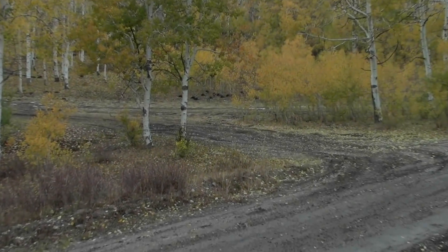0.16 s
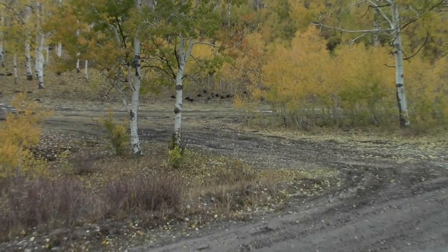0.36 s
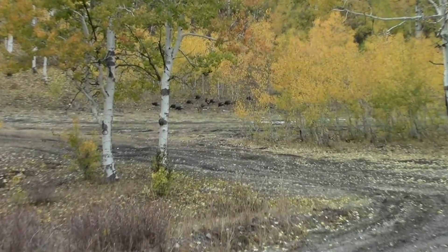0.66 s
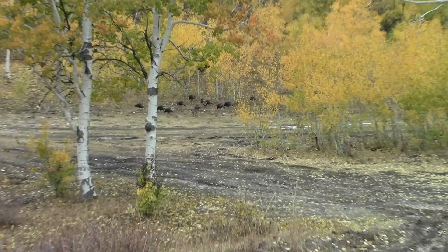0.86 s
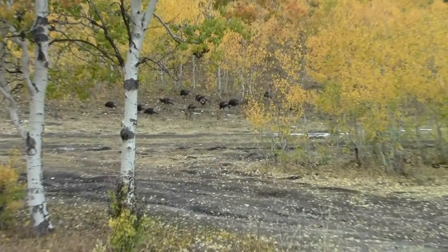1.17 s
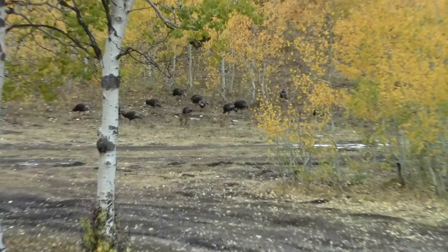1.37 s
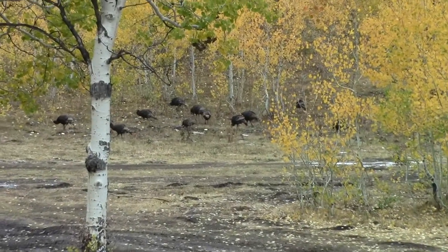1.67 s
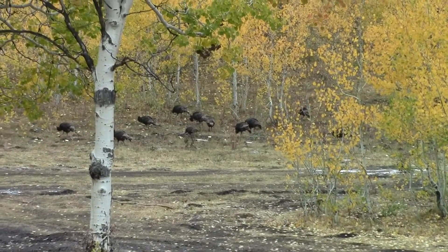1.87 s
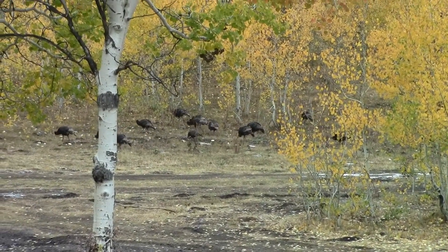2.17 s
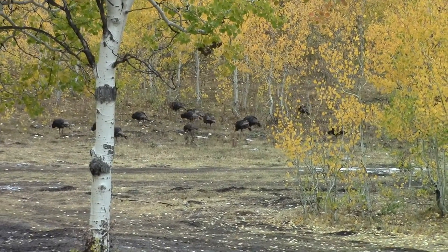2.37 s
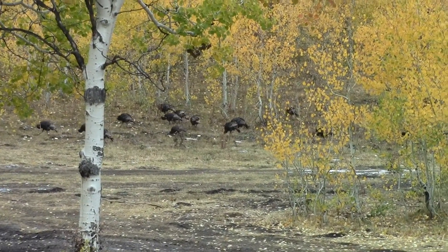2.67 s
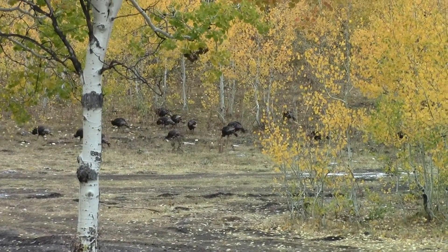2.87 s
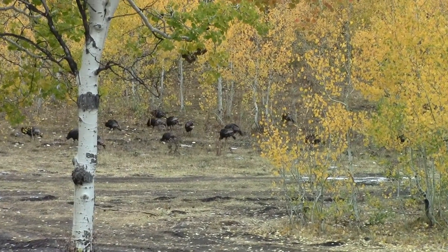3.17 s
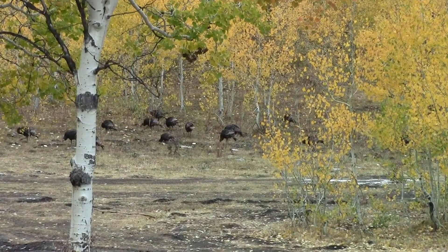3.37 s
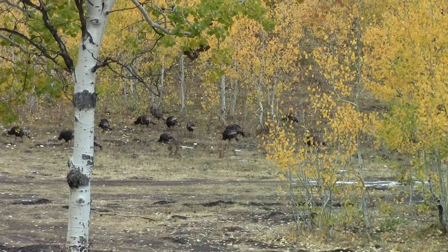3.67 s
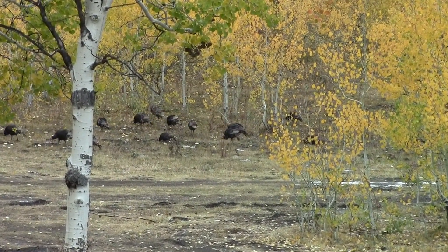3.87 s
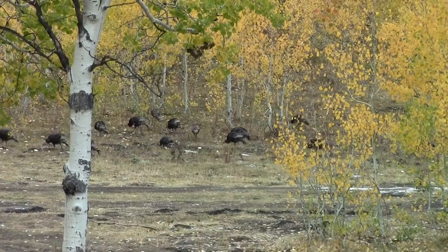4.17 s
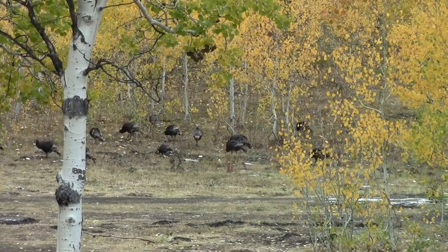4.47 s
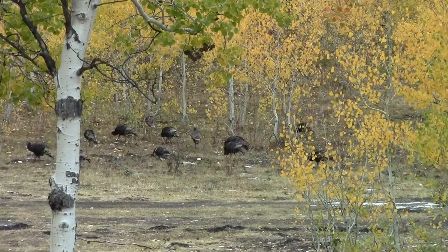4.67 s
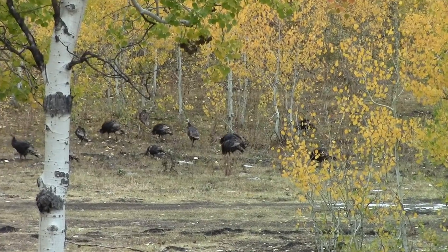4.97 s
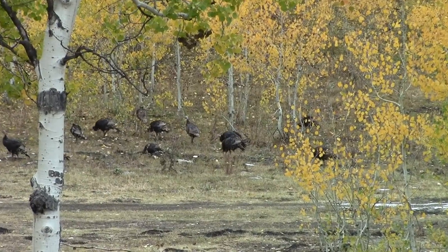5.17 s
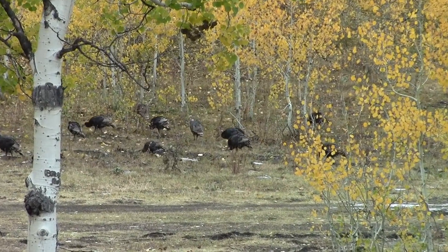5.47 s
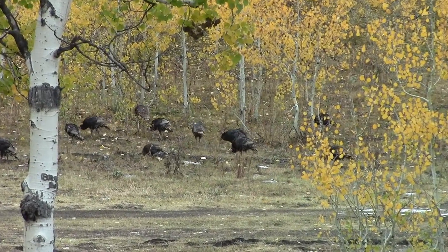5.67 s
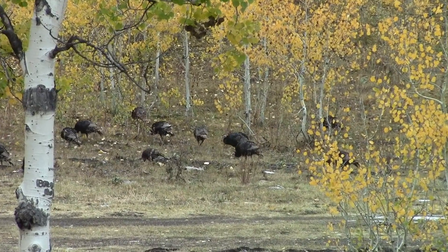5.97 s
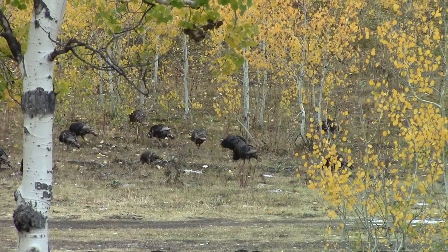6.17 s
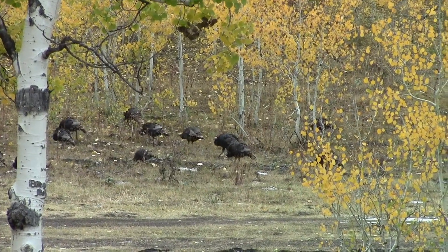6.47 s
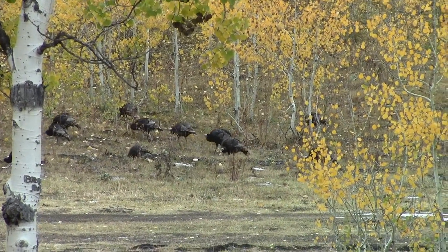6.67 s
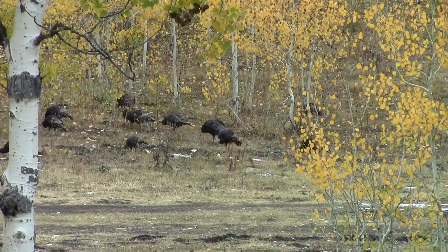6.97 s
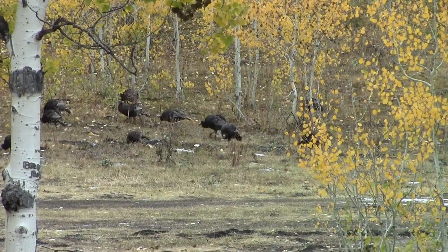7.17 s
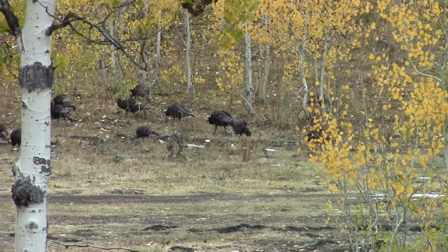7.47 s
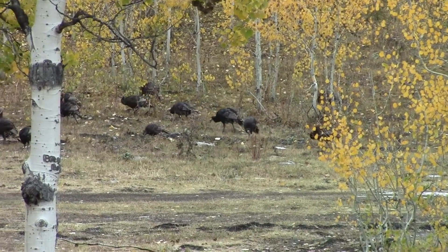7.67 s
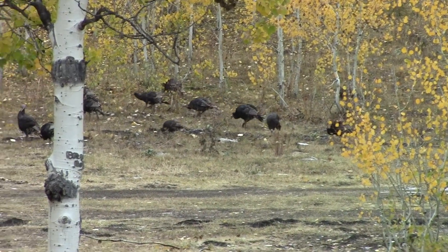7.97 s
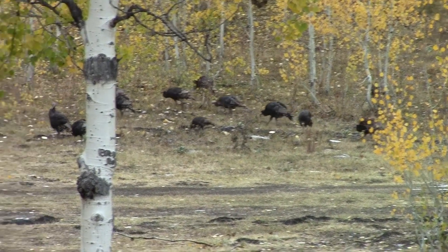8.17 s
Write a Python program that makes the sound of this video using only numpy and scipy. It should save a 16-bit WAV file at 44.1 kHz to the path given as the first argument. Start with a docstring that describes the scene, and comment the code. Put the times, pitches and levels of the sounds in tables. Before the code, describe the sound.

Quiet open woodland, about 8.3 seconds, heard through a hand-held camera microphone. Soft leaf hiss and low air run throughout, with a very faint low drone fading away. From 0 to 1.6 s a small zoom motor hums and whirrs, then stops. At 0.75 s a near turkey gives a soft falling note, with a dull camera bump. From 1.1 to 3.4 s come eight loud yelps roughly 0.3 s apart, each starting as a high whistle, plunging into a nasal, raspy note and flicking upward; four crack lower midway. Tiny falling peeps appear around 1.1, 2.6 and 2.9 s. Trunks return short echoes. A far turkey answers, hollow and reverberant, at 4.2, 5.1, 5.4, 5.7, 6.0 and 6.4 s, strongest at 5.7 and 6.0. Dry leaf ticks and brief rustles continue, with soft bumps near 2.4, 4.2-4.4 and 7.4 s, before a quiet, breezy end.

```python
"""Turkeys calling across a clearing

A near bird gives a soft falling note, then eight yelps that swoop down and flick up; a far bird answers.
Each voice is a sum of harmonic partials, in four near yelps cracking to a lower register, with noise for rasp.
Trunks, brush and deep wood return echoes; filtered noise makes the leaf hiss and a low drone.
Decaying noise bursts make leaf ticks and bumps on a hand-held camera; its zoom motor hums at the start."""
import sys
import numpy as np
from scipy import signal
from scipy.fft import rfft, irfft, next_fast_len
from scipy.io import wavfile
from scipy.ndimage import uniform_filter1d

SR = 44100
rng = np.random.default_rng(int(sys.argv[2]) if len(sys.argv) > 2 else 0)


def generate_wav(sig):
    """Save sig (samples, or channels by samples) to the path in sys.argv[1] as 16-bit PCM at SR."""
    pcm = np.round(np.clip(np.atleast_2d(sig).T, -1, 1) * 32767).astype(np.int16)
    wavfile.write(sys.argv[1], SR, pcm)


N = 367617
TIME = np.arange(N) / SR
TOP_HZ = 15800  # upper limit of the partials and of the final low-pass


def undb(db):
    """Amplitude gain is ten to the power of decibels over twenty."""
    return 10 ** (np.asarray(db) / 20)


def unit(x):
    """Normalisation: division by the root mean square gives rms 1."""
    return x / np.sqrt(np.mean(x ** 2))


def at_hz(points, hz):
    """Interpolation of (frequency [Hz], value) points on a logarithmic frequency axis."""
    f, value = np.transpose(points)
    return np.interp(np.log(np.maximum(hz, 1)), np.log(f), value)


def colour(x, points):
    """Linear filtering: the spectrum is multiplied by a (frequency [Hz], gain [dB]) curve."""
    n = x.shape[-1]
    size = next_fast_len(n, True)
    gain = undb(at_hz(points, np.fft.rfftfreq(size, 1 / SR)))
    return irfft(rfft(x, size) * gain, size)[..., :n]


def wobble(n, rate_hz, size=4096):
    """Slow random modulation: smoothed noise of spread about 1, moving up to about rate_hz."""
    steps = np.arange(n) * 8 * rate_hz / SR
    path = unit(np.convolve(rng.standard_normal(size), np.hanning(7), "same"))
    return np.interp(steps, np.arange(len(path)), path)


def band_noise(n, hz, spread):
    """Band-pass noise: white noise weakened away from the band hz / spread to hz * spread."""
    size = next_fast_len(n, True)
    f = np.fft.rfftfreq(size, 1 / SR) + 1
    detune = (f / hz - hz / f) / (spread - 1 / spread)
    spectrum = rfft(rng.standard_normal(size)) / np.hypot(1, detune ** 2)
    return unit(irfft(spectrum, size))[:n]


def add(out, start_s, x):
    """Superposition: x is summed into out from start_s on."""
    i = max(int(start_s * SR), 0)
    out[..., i:i + x.shape[-1]] += x[..., :N - i]


def gate(t, start, end, fade_s):
    """Amplitude envelope: 1 between start and end, with sine-squared edges just outside."""
    edge = np.clip(np.minimum(t - start, end - t) / fade_s + 1, 0, 1)
    return np.sin(np.pi / 2 * edge) ** 2


def soften(x, size=130):
    """Moving average: steps of a control are rounded over size samples."""
    return uniform_filter1d(x, size, axis=-1, mode="nearest")


# Spectral shape of leaf hiss and low air: (frequency [Hz], relative density [dB])
WOODS_SPECTRUM = [(18, -28), (30, 9.5), (32, -5.5), (81, -1), (114, -3), (178, -2), (258, -1), (286, -0.5),
                  (628, -7.5), (735, -7), (1490, -8.5), (1990, -10), (5120, -12), (9600, -16.5),
                  (15800, -25.5)]
# Stereo width of the woods: (frequency [Hz], side minus mid [dB])
WOODS_WIDTH = [(30, -17.5), (70, -10.5), (130, -1), (280, -0.5), (1000, -2), (4000, -9), (12000, -6)]
# Breeze in the leaves: (time [s], gain [dB])
BREEZE = [(0, 3), (.6, 1.1), (1.2, 1.8), (3.8, 1), (8.3, 0.5)]
WOODS_DB = -56  # rms of the mid signal before the breeze


def woods(swell_db=0.58):
    """Broadband turbulence: leaf hiss swells faintly over steady low air; the deepest bass is nearly mono."""
    mid, side = colour(rng.standard_normal((2, N)), WOODS_SPECTRUM)
    side = colour(side, WOODS_WIDTH)
    air = np.array([mid + side, mid - side]) / np.std(mid)
    low = signal.sosfiltfilt(signal.butter(2, 450, fs=SR, output="sos"), air)
    hiss = (air - low) * undb(swell_db * wobble(N, 11.0))
    return (low + hiss) * undb(WOODS_DB + np.interp(TIME, *np.transpose(BREEZE)))


# Faint drone under the woods: (time [s], level [dB])
DRONE_LEVEL = [(0, -64.5), (4.3, -67.5), (6, -71), (8.3, -84)]
DRONE_HZ = 97


def low_drone():
    """Narrow-band noise: a small bandwidth gives random noise an audible low pitch."""
    return undb(np.interp(TIME, *np.transpose(DRONE_LEVEL))) * band_noise(N, DRONE_HZ, 1.15)


# Zoom motor hum: (time [s], rms level [dB])
ZOOM_LEVEL = [(0, -59), (1.45, -59.5), (1.56, -68), (1.7, -120)]
ZOOM_HZ = 229


def zoom_motor(whirr_db=-4, waver=.004):
    """Frequency modulation: the motor's sine hum wavers in pitch beside band noise for gear whirr."""
    hz = ZOOM_HZ * (1 + waver * wobble(N, 9.2))
    hum = np.sqrt(2) * np.sin(2 * np.pi * np.cumsum(hz) / SR)
    whirr = undb(whirr_db) * band_noise(N, 257, 2.3)
    return undb(np.interp(TIME, *np.transpose(ZOOM_LEVEL))) * (hum + whirr)


def knocks(rows, spread, attack_s, side, snap_s=0.00019, size=8192):
    """Time-bandwidth reciprocity: decaying bursts of band noise, wider in band the shorter they are."""
    out = np.zeros((2, N))
    t = np.arange(size) / SR
    for start, db, hz, decay_s in rows:
        shape = (1 - np.exp(-t / attack_s)) * np.exp(-t / decay_s)
        mid, wide = (shape * band_noise(size, hz, spread + snap_s / decay_s) for _ in range(2))
        stereo = np.array([mid + side * wide, mid - side * wide])
        add(out, start, undb(db) * stereo / np.abs(mid).max())
    return out


# Soft bumps on the camera body: (time [s], peak level [dB], centre frequency [Hz], decay time [s])
CAMERA_BUMPS = [(.795, -34, 295, 0.046), (2.374, -35, 383, 0.0065), (4.224, -41.5, 195, 0.029),
                (4.365, -36.5, 122, 0.024), (4.385, -42, 280, 0.036), (7.405, -46, 397, 0.0097),
                (7.42, -43.5, 164, 0.018), (7.68, -51, 170, 0.022), (8.04, -57, 35.5, 0.027)]


def camera_bumps():
    """Damped impact response: each bump is a dull, nearly mono noise burst."""
    return knocks(CAMERA_BUMPS, spread=1.68, attack_s=0.0017, side=0.1)


def leaf_patter(peak_db=-44, scatter_db=3.5, count=70):
    """Random point process: faint ticks of dry leaves fall at independent random moments."""
    when, strength, pitch = rng.random((count, 3)).T
    level_db = peak_db + scatter_db * (2 * strength - 1)
    rows = np.transpose([when * TIME[-1], level_db, 4500 + 3000 * pitch, np.full(count, .002)])
    return knocks(rows, spread=1.15, attack_s=.0002, side=.4, size=1024)


# Dry leaves and twigs ticking close by: (time [s], peak level [dB], centre frequency [Hz], decay time [s])
LEAF_TICKS = [(2.754, -35, 7640, .006), (3.1353, -34, 7300, .008), (3.5425, -30, 1625, .0018),
              (3.757, -38, 7190, .0013), (3.988, -35, 4560, .0013), (4.0552, -38, 6270, .0009),
              (4.585, -44, 1490, .0034), (4.611, -35, 7500, .0007), (4.7487, -35.5, 7000, .0008),
              (5.2226, -32, 7060, .0007), (6.4428, -35, 7500, .0011), (6.6703, -37, 5500, .0015),
              (6.9731, -36, 4270, .0019), (7.1477, -35, 7000, .0015), (7.2724, -38, 5940, .002),
              (7.6535, -33.5, 9000, .0008)]
# Leaves brushing for a moment: (time [s], peak level [dB], centre frequency [Hz], decay time [s])
LEAF_RUSTLES = [(5.17, -44.5, 3900, 0.028), (5.825, -47.5, 6400, 0.014), (7.14, -47, 2460, 0.044),
                (7.32, -44, 5900, .025)]


def leaves():
    """Transient excitation: a fast attack makes a tick, a slower attack and wider band a rustle."""
    ticks = knocks(LEAF_TICKS, spread=1.22, attack_s=.0001, side=0.26)
    rustles = knocks(LEAF_RUSTLES, spread=1.75, attack_s=0.012, side=0.26)
    return ticks + rustles + leaf_patter()


# What the forest sends back: (frequency [Hz], gain [dB])
ECHO_COLOUR = [(200, -10), (680, -7), (1080, 0), (1550, 2), (2100, -3), (2600, 0), (3500, 0), (4500, -5),
               (8000, -10), (15000, -16)]
# Echoes off nearby trunks and the ground: (delay [s], level relative to the direct sound [dB])
TRUNK_ECHOES = [(.0061, -20.5), (0.0127, -12.5), (0.0203, -20.5), (.027, -20)]


def forest(x, brush_db, tail_db, brush_s=0.013, t60_s=0.9, edge_s=0.1774, edge_db=3, side_db=-7):
    """Convolution reverberation: trunk echoes, brush scatter, deep-wood decay, a soft far-edge echo."""
    t = np.arange(int(1.2 * SR)) / SR
    brush = np.exp(-t / brush_s) * (t > .004)
    edge = 1 + undb(edge_db) * np.exp(-((t - edge_s) / 0.0066) ** 2)
    tail = undb(-60 * t / t60_s) * (1 - np.exp(-t / 0.037)) * edge
    shape = undb(brush_db) * brush / np.linalg.norm(brush) + undb(tail_db) * tail / np.linalg.norm(tail)
    mid, side = shape * colour(rng.standard_normal((2, len(t))), ECHO_COLOUR)
    for delay_s, db in TRUNK_ECHOES:
        mid[int(delay_s * SR)] += undb(db)
    responses = [mid + sign * undb(side_db) * side for sign in (1, -1)]
    return np.array([x + signal.fftconvolve(x, response)[:N] for response in responses])


# Short falling peeps of the flock:
# (time [s], rms level [dB], start frequency [Hz], end frequency [Hz], length [s])
FLOCK_PEEPS = [(1.068, -56, 2700, 2400, 0.01), (2.57, -48, 2800, 2370, 0.019),
               (2.887, -44.5, 2550, 2220, 0.023), (2.888, -49, 1347, 1110, 0.021)]


def flock():
    """Linear chirp: each tiny peep is one sine whose frequency slides down."""
    out = np.zeros(N)
    for start, db, high_hz, low_hz, length in FLOCK_PEEPS:
        t = np.arange(-.004, length + 0.0033, 1 / SR)
        hz = np.interp(t, [0, length], [high_hz, low_hz])
        phase = 2 * np.pi * np.cumsum(hz) / SR
        add(out, start + t[0], np.sqrt(2) * undb(db) * gate(t, 0, length, .004) * np.sin(phase))
    return out


# Yelps of the far bird: (time [s], length [s], fundamental rms level [dB], held pitch [Hz],
#  step down at the crack [share of held pitch], gain of the high opening [dB])
FAR_YELPS = [(4.234, 0.067, -60, 614, 0.07, 3.5), (5.072, 0.075, -57.5, 627, .08, 3),
             (5.4, .075, -56.5, 625, .05, -1.5), (5.71, 0.089, -48, 682, 0.46, 1.5),
             (6.025, .084, -47.5, 675, 0.4, -1.5), (6.389, 0.086, -56, 652, 0.294, 3)]
# opening pitch as a multiple of the held pitch; swoop time constant [s]; crack after the start [s]
FAR_OPENING_RATIO, FAR_SWOOP_S, FAR_CRACK_S = 2.02, .018, .028


def far_bird(second_db=-15, third_db=-21, jitter=0.022, crack_s=0.0005, fade_s=0.0055):
    """Distance loss of overtones: a swoop and crack with little but the fundamental left."""
    out = np.zeros(N)
    for start, length, level_db, held_hz, step, opening_db in FAR_YELPS:
        t = np.arange(-fade_s, length + fade_s, 1 / SR)
        high = 1 / (1 + np.exp((t - FAR_CRACK_S) / crack_s))  # 1 before the crack, 0 after
        swoop = (FAR_OPENING_RATIO - 1 - step) * np.exp(-np.maximum(t, 0) / FAR_SWOOP_S)
        pitch = held_hz * (1 + swoop + step * high) * (1 + jitter * wobble(len(t), 145))
        phase = 2 * np.pi * np.cumsum(pitch) / SR
        voice = np.sin(phase) + undb(second_db) * np.sin(2 * phase) + undb(third_db) * np.sin(3 * phase)
        level = np.sqrt(2) * undb(level_db + opening_db * high)
        add(out, start + t[0], level * gate(t, fade_s, length, fade_s) * voice)
    return out


# Throat and beak resonance on the overtones: (frequency [Hz], gain [dB])
THROAT = [(1000, -13.5), (2000, 1.5), (2550, 7), (3200, -4.5), (3650, 6.5), (4000, -7), (4350, -27),
          (5200, -27), (6500, -36.5), (8400, -26), (9600, -44), (15000, -48.5)]
# Spectral shape of turbulent air in a raspy note: (frequency [Hz], relative level [dB])
RASP_SPECTRUM = [(100, -38), (160, -18), (330, -38), (480, -36), (900, -17), (1400, 2), (1850, -11),
                 (3900, -15), (4600, -35), (8200, -39), (15000, -56)]
# Spectral shape of the soft hiss on every near note: (frequency [Hz], relative level [dB])
BEAK_HISS = [(1000, -23), (4000, -24), (6500, 3), (8300, 4), (9600, -10.5), (15000, -18)]
WAVER_DB, WAVER_HZ = 1.2, 45  # each partial wavers in strength on its own


def syrinx(hz, partial_db, rasp, beat, jitter=.01, tremor=.002, shimmer=.15, flutter_hz=220,
           beat_hz=165, rasp_db=-3.5, hiss_db=-34, count=16):
    """Source-filter principle: membrane partials shaped by the throat; rasp makes cycles uneven and airy."""
    n = len(hz)
    first_db, second_db, upper_db = partial_db
    rasp = np.clip(rasp, 0, 1)
    pitch = hz * (1 + (tremor + jitter * rasp) * wobble(n, flutter_hz))
    # a slower second vibration of the syrinx sets side tones around each overtone
    slow = np.sin(2 * np.pi * np.cumsum(beat_hz * (1 + .08 * wobble(n, 40))) / SR)
    phase = 2 * np.pi * np.cumsum(pitch) / SR
    voice = np.zeros(n)
    for k in range(1, count + 1):
        if k == 1:
            db = first_db
        elif k == 2:
            db = second_db
        else:
            db = upper_db + at_hz(THROAT, k * pitch)
        uneven = 1 + shimmer * min(k, 3) * rasp * wobble(n, flutter_hz)
        waver = undb(WAVER_DB * wobble(n, WAVER_HZ))
        # the highest partials lose their grip on the cycle and blur
        blur = np.clip((k * pitch - 4200) / 5000, 0, .45) * wobble(n, flutter_hz)
        partial = np.sin(k * phase + min(k - 1, 2) * beat * slow + blur)
        voice += undb(db) * uneven * waver * partial * (k * pitch < TOP_HZ)
    pulse = 1 + .5 * np.sin(phase)  # the noise pulses with the fundamental
    air = unit(colour(rng.standard_normal(n), RASP_SPECTRUM)) * pulse
    hiss = unit(colour(rng.standard_normal(n), BEAK_HISS)) * pulse
    air_gain = undb(rasp_db + np.max(partial_db, axis=0)) * rasp ** 2
    return np.sqrt(2) * (voice + air_gain * air + undb(hiss_db + upper_db) * hiss)


OPENER_S, OPENER_LENGTH_S, OPENER_FROM_HZ, OPENER_TO_HZ = .738, 0.074, 950, 519
OPENER_DB, OPENER_FADE_DB = -37.5, 13.5  # fundamental level at the start, and how far it falls


def opener(swoop_s=0.025, second_db=-14, upper_db=-25, rasp=0.41):
    """Exponential glide: a soft note relaxes towards its low pitch and fades."""
    t = np.arange(0, OPENER_LENGTH_S, 1 / SR)
    hz = OPENER_TO_HZ + (OPENER_FROM_HZ - OPENER_TO_HZ) * np.exp(-t / swoop_s)
    db = OPENER_DB - OPENER_FADE_DB * (t / OPENER_LENGTH_S) ** 2
    voice = syrinx(hz, (db, db + second_db, db + upper_db), rasp, 0)
    return gate(t, .004, t[-1] - .004, .004) * voice


# Mid-yelp cracks into a lower register, held until the flick: (time [s], pitch at the crack [Hz],
#  fundamental [dB], second partial [dB], upper partials [dB], rasp [0-1])
CRACKS = [(1.478, 648, -25.5, -24, -30.5, 0.34), (1.821, 817, -27.5, -13.5, -28.5, 0.06),
          (2.118, 601.8, -22, -26.5, -34, 0.82), (2.751, 806, -37, -20, -33.5, 0.51)]
# Strength of the whistle by its pitch: (frequency [Hz], gain [dB])
WHISTLE = [(1150, -5), (1500, 1), (1750, -7.5), (2050, -15), (2800, -16)]
# octaves above the lowest pitch where the voice is a pure whistle, and the drop of its overtones there
WHISTLE_OCTAVES, WHISTLE_PURITY_DB = 0.51, 9.5
# BOW_S away from peak effort the pitch has risen by the bow, rasp has grown by the share SLACK_RASP,
# and (fundamental, second partial, upper partials) have sunk by EFFORT_SAG_DB
BOW_S, SLACK_RASP, EFFORT_SAG_DB = .05, .5, (2, 5, 9.5)
# by its end a cracked note has crept up by this share of its pitch and its partials have sunk by these dB
CRACK_LIFT, CRACK_SAG_DB = .075, (4, 6, 0.5)
# stumble at each change of register: added rasp, time scale, dip of the level
STUMBLE_RASP, STUMBLE_S, STUMBLE_DIP_DB = 0.28, 0.0045, 5.5
FLICK_FADE_DB = 1.5  # fade by the end of the flick


def yelp(row, fade_s=.003):
    """Register transition: whistle to bowed note, perhaps a crack to low register, then an upward flick."""
    (start, length, open_hz, swoop_s, bend, low_hz, peak_s, bow_hz,
     flick_s, flick_hz, end_hz, whistle_db, *peak_db, rasp, beat) = row
    flick = start + length
    t = np.arange(start - fade_s, flick + flick_s + fade_s, 1 / SR)

    # slack is zero at peak effort
    slack = ((t - start - peak_s) / BOW_S) ** 2
    bowed = low_hz + bow_hz * slack
    hz = bowed + (open_hz - bowed) * np.exp(-(np.maximum(t - start, 0) / swoop_s) ** bend)
    # thin is 1 in the whistle and 0 in the full voice
    thin = np.where(t < flick, np.clip(np.log2(hz / low_hz) / WHISTLE_OCTAVES, 0, 1) ** 2, 1)
    db = np.array(peak_db)[:, None] - np.outer(EFFORT_SAG_DB, np.minimum(slack, 1))
    rasp = rasp * (1 + SLACK_RASP * np.minimum(slack, 1))
    stumble = np.exp(-((t - flick) / STUMBLE_S + .5) ** 2)

    for crack, crack_hz, *crack_db, crack_rasp in CRACKS:
        if start < crack < flick:
            low = (t > crack) & (t < flick)
            tired = ((t - crack) / (flick - crack)) ** 2
            hz = np.where(low, crack_hz * (1 + CRACK_LIFT * tired), hz)
            rasp = np.where(low, crack_rasp, rasp)
            db = np.where(low, np.array(crack_db)[:, None] - np.outer(CRACK_SAG_DB, tired), db)
            stumble = stumble + np.exp(-((t - crack) / STUMBLE_S) ** 2)

    flicked = np.clip((t - flick) / flick_s, 0, 1)
    hz = soften(np.where(t < flick, hz, flick_hz + (end_hz - flick_hz) * flicked), size=50)
    overtone_db = peak_db[2] - WHISTLE_PURITY_DB
    second_db = overtone_db + at_hz(THROAT, 2 * hz)
    whistle = at_hz(WHISTLE, hz) + np.array(np.broadcast_arrays(whistle_db, second_db, overtone_db))
    db = soften(db + thin * (whistle - db)) - STUMBLE_DIP_DB * stumble - FLICK_FADE_DB * flicked ** 2
    voice = syrinx(hz, db, rasp + STUMBLE_RASP * stumble * (1 - rasp), beat)
    return t[0], gate(t, start, flick + flick_s, fade_s) * voice


# Near yelps, each a swoop, a bow whose pitch is lowest at peak effort, and a flick:
# (time [s], length up to the flick [s], opening pitch [Hz], swoop time [s],
#  swoop bend [exponent: 1 exponential, larger holds then plunges], lowest bowed pitch [Hz],
#  peak effort after the start [s], bow [Hz], flick length [s], flick start [Hz], flick end [Hz],
#  whistle [dB], fundamental [dB], second partial [dB], upper partials [dB],
#  rasp at peak effort [0-1], side-tone depth [rad])
YELPS = [(1.107, .126, 1196, 0.012, 0.84, 854.4, .076, 98.5, 0.011, 987, 1200, -29, -26, -43, -40.5, 0.12, .02),
         (1.424, .112, 1420, .006, 1, 857, .042, 296, 0.038, 998, 1820, -26.5, -28.5, -24.5, -28.5, 0.27, 0.13),
         (1.744, 0.12, 2276, 0.0075, 1, 1004, 0.078, 94.7, 0.033, 1235, 2180, -20, -24.5, -27, -26, 0.2, 0.18),
         (2.057, .119, 2691, 0.015, 1.24, 938, 0.064, 59, .028, 1372, 1720, -21, -26, -24.5, -25.5, 0.22, 0.36),
         (2.359, .111, 2777, .008, 1.2, 1070, 0.058, 204, .027, 1346, 2030, -23, -23, -32, -33, 0.26, 0.36),
         (2.665, .111, 1700, 0.0049, 1.07, 937, .05, 198.4, 0.02, 1468, 2105, -23, -28, -32, -29, 0.37, 0.084),
         (2.978, 0.12, 1915, .016, 1.67, 1042, .062, 116.6, 0.0277, 1457, 2040, -23.5, -25, -34, -34.5, 0.23, 0.32),
         (3.313, 0.08, 2154, 0.013, 2.45, 1107, 0.04, 60, .028, 1376, 1860, -23.5, -25, -44, -33.5, 0, .08)]


def near_bird():
    """Superposition of notes: a soft opening note, then the run of loud yelps."""
    out = np.zeros(N)
    add(out, OPENER_S, opener())
    for row in YELPS:
        add(out, *yelp(row))
    return out


# Level difference of the birds between the channels: (frequency [Hz], left minus right [dB])
BIRD_SIDE = [(500, 1.1), (1300, 1.2), (2600, .3), (4500, -.3), (9000, -.8)]


def place_birds(stereo):
    """Interaural level difference: lows and mids lean left, the treble slightly right."""
    left = colour(stereo[0], [(hz, db / 2) for hz, db in BIRD_SIDE])
    right = colour(stereo[1], [(hz, -db / 2) for hz, db in BIRD_SIDE])
    return np.array([left, right])


def scene():
    """Superposition of sources: woods, camera and leaves around the echoing birds."""
    background = woods() + low_drone()
    camera = zoom_motor() + camera_bumps()
    far = forest(far_bird(), brush_db=-16, tail_db=-7)
    near = forest(near_bird() + flock(), brush_db=-17, tail_db=-18.5)
    return background + camera + leaves() + place_birds(near + far)


def record(dry, offset=.0104):
    """Low-pass filtering: an elliptic filter cuts the top; a small constant offset is added."""
    low_pass = signal.ellip(10, .1, 70, TOP_HZ, fs=SR, output="sos")
    return signal.sosfilt(low_pass, dry) + offset


dry = scene()
out = record(dry)
generate_wav(out)
```